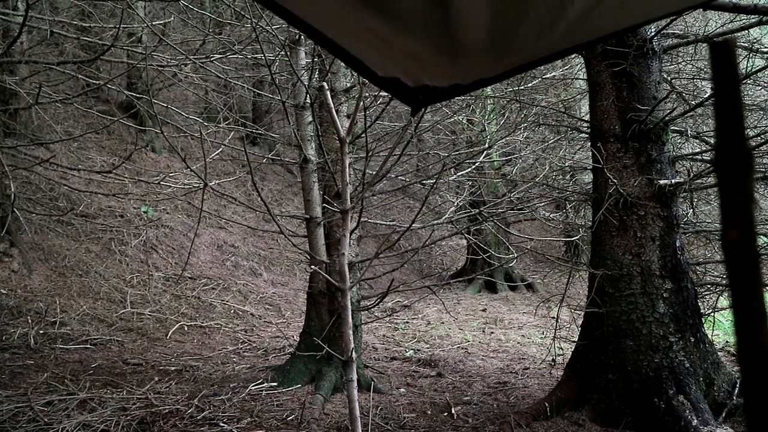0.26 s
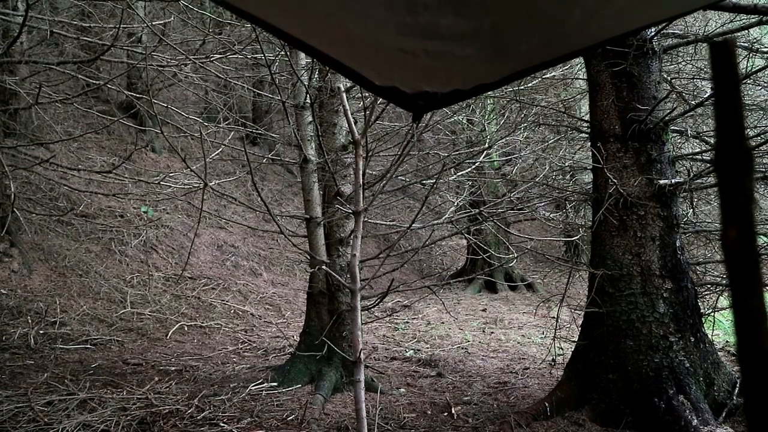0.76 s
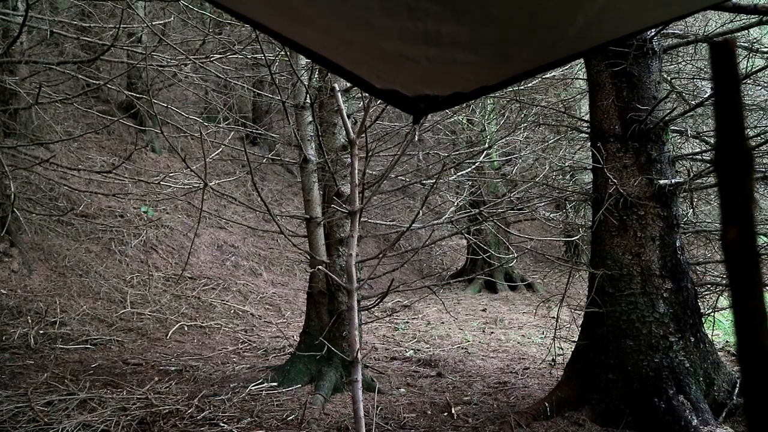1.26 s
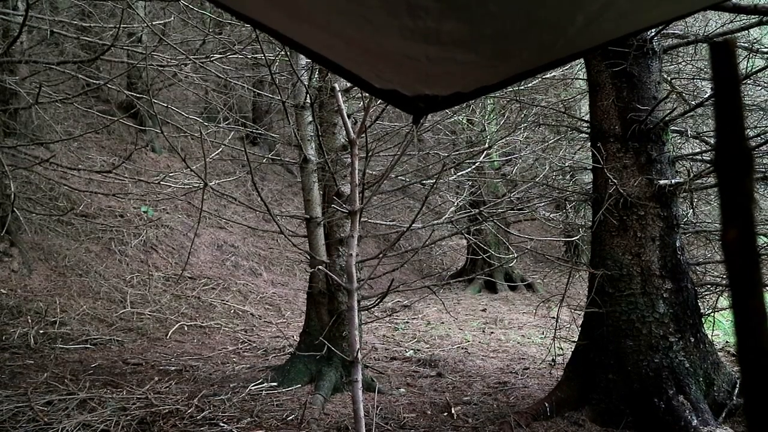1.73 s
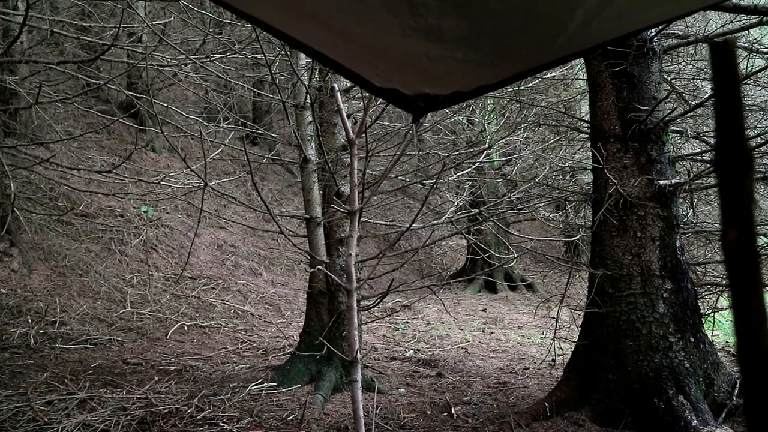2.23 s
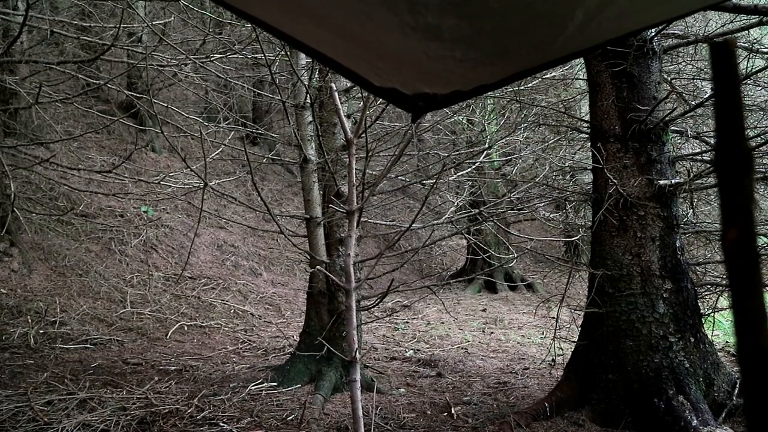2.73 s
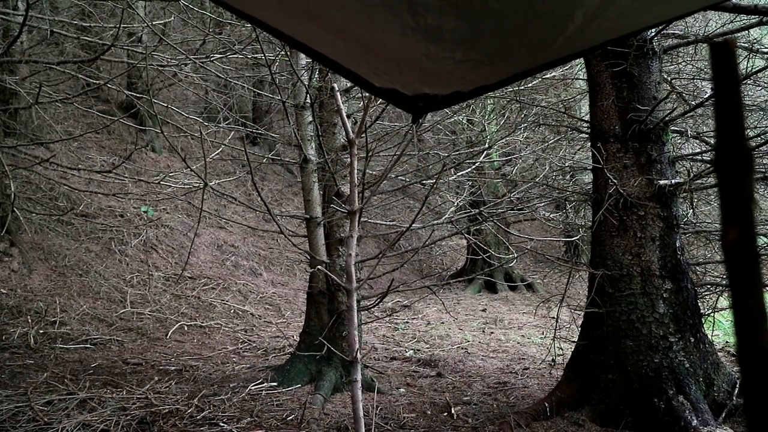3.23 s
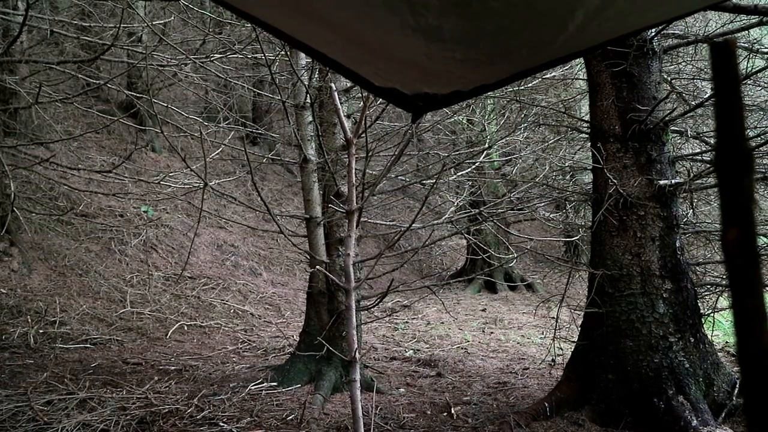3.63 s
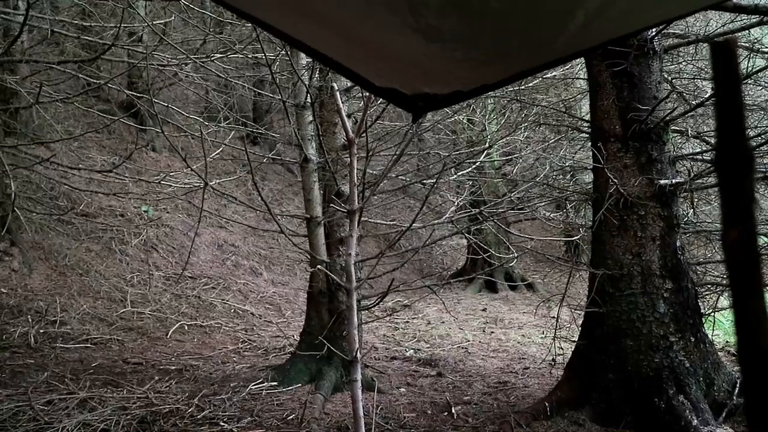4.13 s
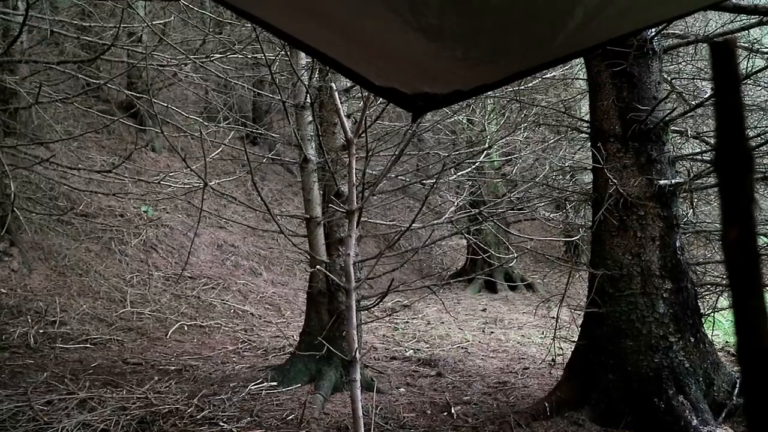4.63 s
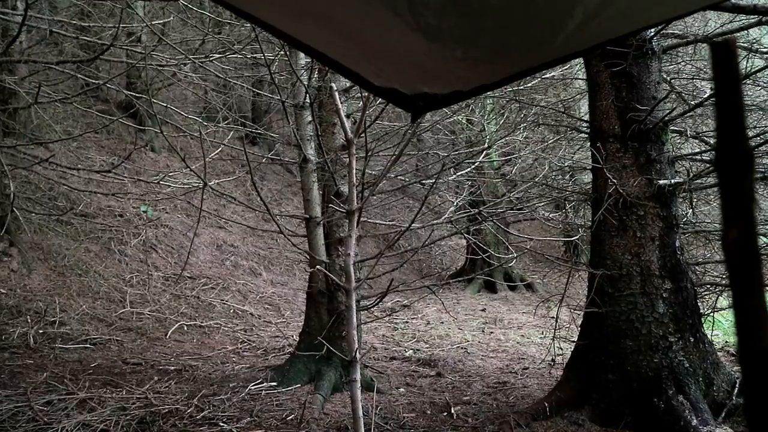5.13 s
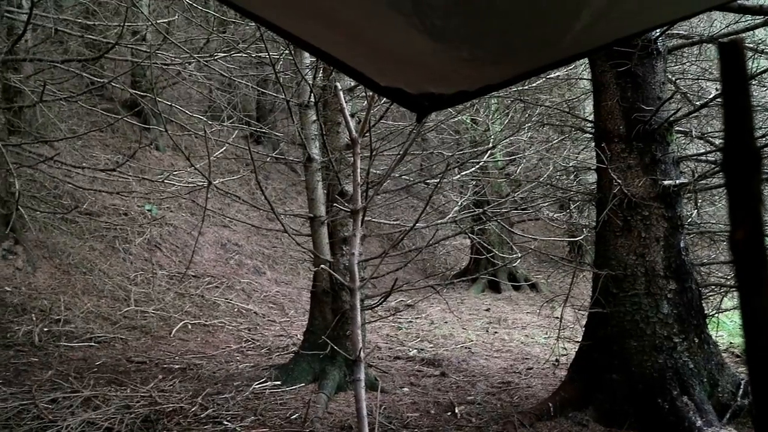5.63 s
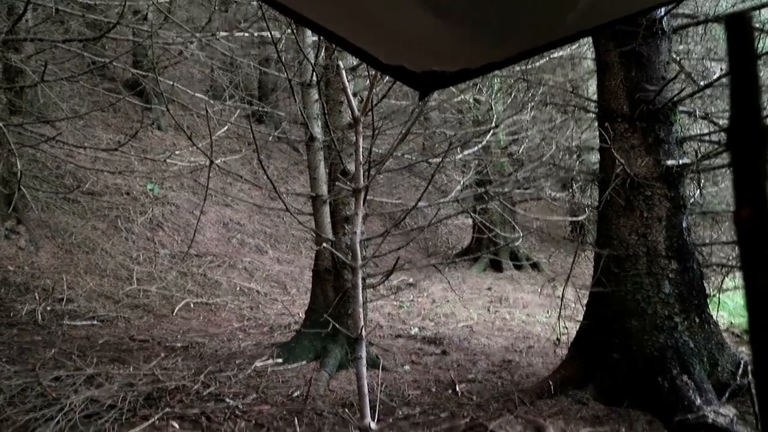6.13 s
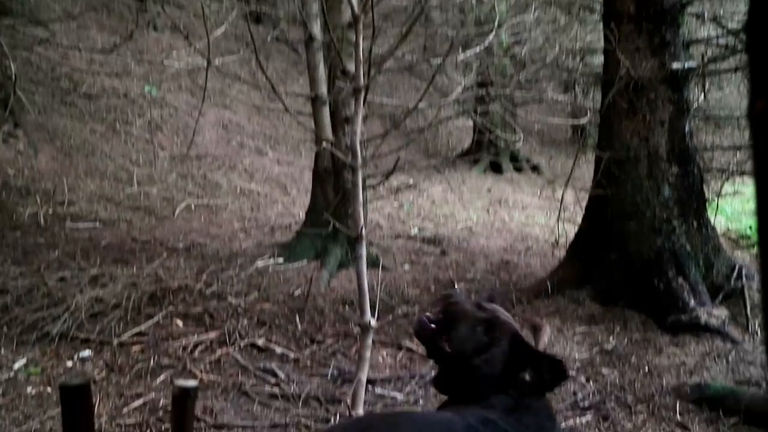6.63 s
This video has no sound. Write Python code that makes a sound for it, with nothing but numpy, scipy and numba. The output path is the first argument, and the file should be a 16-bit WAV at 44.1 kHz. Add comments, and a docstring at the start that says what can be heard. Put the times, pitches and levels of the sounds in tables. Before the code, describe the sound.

Steady wind in conifers; close by, a dog crunches litter, cracks brittle sticks and jingles a metal tag, then fingers bump the microphone.

```python
"""Wind rushes through conifers above a forest camp throughout, while a dog moves about close to the microphone.
It treads on needle litter and breaks dry twigs, modelled as filtered runs of tiny fractures, and from 0.4 s
its metal collar tag jingles as a sum of decaying modes. The breaking is densest from 3.8 to 5.2 s. A hand rests
on the recorder from 4.4 s and taps its case at 5.4 s, with rubs before and after: a short tone and low noise.
Gain control ducks under strong treble and recovers slowly."""
import sys
import numpy as np
from scipy import signal
from scipy.fft import rfft, irfft, next_fast_len
from scipy.io import wavfile
from scipy.ndimage import uniform_filter1d
from numba import njit

SR = 44100
rng = np.random.default_rng(int(sys.argv[2]) if len(sys.argv) > 2 else 0)


def to_wav(s):
    """Save 16-bit WAV."""
    ch = np.atleast_2d(s).T  # columns
    pcm = np.round(np.clip(ch, -1, 1) * 32767)  # PCM
    wavfile.write(sys.argv[1], SR, pcm.astype(np.int16))


N = 303452
TIME = np.arange(N) / SR
HIT = TIME[:SR // 4]  # time axis of one short blow, s


def undb(db):
    """Amplitude gain is the exponential of a level in decibels."""
    return 10 ** (np.asarray(db) / 20)


def unit(x):
    """Normalization: divide by the root mean square."""
    return x / np.sqrt(np.mean(x ** 2))


def curve(rows):
    """Linear interpolation of (time_s, value) rows."""
    return np.interp(TIME, *np.transpose(rows))


def fade(t, t60):
    """Exponential decay by 60 dB in t60 seconds, starting at t = 0."""
    return np.exp(-np.log(1000) * np.maximum(t, 0) / t60)


def add(out, start_s, x):
    """Superposition: mix x into out from start_s."""
    i = int(start_s * SR)
    out[i:i + len(x)] += x[:N - i]


def spectrum_db(hz, points):
    """Linear interpolation of (freq_hz, level_db) points on a log-frequency axis."""
    point_hz, point_db = np.transpose(points)
    return np.interp(np.log(hz + 1), np.log(point_hz), point_db)


def colour(x, points):
    """Minimum-phase filtering: folding the cepstrum makes the given spectrum causal."""
    n = next_fast_len(2 * len(x), True) // 2 * 2
    hz = np.arange(n // 2 + 1) * SR / n
    cepstrum = irfft(np.log(undb(spectrum_db(hz, points))))
    cepstrum[1:n // 2] *= 2
    cepstrum[n // 2 + 1:] = 0
    return irfft(rfft(x, n) * np.exp(rfft(cepstrum)))[:len(x)]


def balance(x, edges_hz, levels_db, span_s):
    """Band decomposition: each part of a blow gets its level over the first span_s."""
    out = 0
    for low_hz, high_hz, db in zip(edges_hz, edges_hz[1:], levels_db):
        band = signal.butter(3, [low_hz, min(high_hz, SR * .45)], "band", fs=SR, output="sos")
        part = signal.sosfilt(band, x)
        out = out + undb(db) * part / np.std(part[:int(span_s * SR)])
    return out


def walk(rate_hz):
    """Low-pass random modulation: levels held for 1 / rate_hz and smoothed twice; rms near 1."""
    k = max(int(SR / rate_hz), 2)
    held = np.repeat(rng.standard_normal(N // k + 1), k)
    return unit(uniform_filter1d(uniform_filter1d(held, k), k)[:N])


def crackle(n, rate_hz, spread_db):
    """Shot noise of tiny fractures at random instants, with exponentially spread sizes in dB."""
    sizes = undb(spread_db * np.minimum(rng.exponential(size=n), 5))
    return unit(sizes * rng.standard_normal(n) * (rng.random(n) < rate_hz / SR))


def swells(rows):
    """Power addition of Gaussian strokes from (centre_s, level_db, half_s) rows."""
    return sum(undb(db) ** 2 * np.exp(-((TIME - s) / half) ** 2) for s, db, half in rows)


SPLINTER_DB = -7  # treble of a break, relative to its level
# twigs that ring above THIN_HZ are thin and splinter brighter
THIN_HZ, THIN_DB_PER_OCTAVE = 4100, 20.5
# twigs breaking: start_s, level_db, tear_s (fibres keep tearing), ring_hz, body_db (low band over the level)
TWIG_BREAKS = [(0.5838, -18, 0.0041, 3600, -23), (0.7362, -31.5, 0.0015, 4030, -27),
               (1.019, -35.5, 0.0033, 3650, -18), (1.6, -28.5, 0.0015, 2050, -3),
               (1.77, -38, .001, 5700, -5), (2.106, -36, .001, 4930, -5), (2.16, -34, .001, 3000, -20),
               (3.023, -21, 0.0037, 3520, -23), (3.224, -22, 0.00086, 3650, -1),
               (3.255, -30.5, 0.0012, 5300, -2), (3.429, -26.5, 0.0036, 3460, -15),
               (3.451, -34, 0.0052, 4330, -15), (3.816, -21, 0.0087, 2580, -19),
               (3.839, -25, .0025, 2580, -20), (3.859, -12, 0.00059, 2420, -21),
               (3.867, -16.5, 0.0012, 3570, -30), (3.929, -29, .001, 5010, -12),
               (4.002, -23, 0.0079, 3320, -4.5), (4.015, -15.5, 0.0026, 3230, -21),
               (4.063, -23, 0.0084, 3170, -27.5), (4.07, -7.5, 0.0035, 3230, -25),
               (4.176, -12.5, 0.0018, 3100, 1), (4.28, -24, .008, 2540, -25),
               (4.295, -21.5, 0.022, 3410, -13), (4.375, -33, .003, 3200, -20),
               (4.449, -31.5, 0.0076, 2880, -3), (4.549, -16, 0.0059, 3180, -23),
               (4.559, -12, .008, 3400, -14), (4.626, -29.5, .003, 2640, -24),
               (4.672, -30.5, .002, 3400, -5), (4.706, -26.5, 0.0061, 2860, 0),
               (4.801, -10.5, .003, 2590, -20), (4.806, -3, 0.0044, 2680, -21.5),
               (4.82, -13.5, 0.0063, 2570, -10.5), (5.112, -17.5, 0.00083, 2590, -8),
               (5.143, -6, 0.0013, 2830, -13.5), (5.16, -20, 0.0089, 3400, -20),
               (5.957, -35, .001, 2830, -12), (6.008, -24.5, 0.00093, 2980, -40)]


def twigs(tail_db=-23, t60=.023, tail_t60=.13):
    """Brittle fracture: a run of cracks rings the stick; the litter around it rattles on briefly."""
    out = np.zeros(N)
    for start_s, level_db, tear_s, ring_hz, body_db in TWIG_BREAKS:
        force = fade(HIT - tear_s, t60) + undb(tail_db) * fade(HIT - tear_s, tail_t60)
        crack = colour(force * crackle(len(HIT), rate_hz=9000, spread_db=0.0), stick(ring_hz))
        splinter_db = SPLINTER_DB + THIN_DB_PER_OCTAVE * max(np.log2(ring_hz / THIN_HZ), 0)
        levels_db = level_db + np.array([body_db, 0, splinter_db])
        add(out, start_s, balance(crack, [150, 1900, 5700, 17000], levels_db, tear_s + .004))
    return out


# mean spectrum of a breaking stick: freq_hz, level_db
TWIG_SPECTRUM = [(150, -52.5), (700, -15.5), (1800, -13.5), (2450, -4.5), (3200, 0.5), (4200, -4),
                 (5500, -10), (7500, -6), (10500, -16), (15000, -18)]


def stick(ring_hz, ring_db=7, width_hz=240, ripple_db=3.5):
    """Resonance: one main peak, and many lesser ones that differ from stick to stick."""
    hz = np.arange(150, 17000, 150)
    ripple = unit(uniform_filter1d(rng.standard_normal(len(hz)), size=3))
    main = ring_db / (1 + ((hz - ring_hz) / width_hz) ** 2)
    return np.transpose([hz, spectrum_db(hz, TWIG_SPECTRUM) + main + ripple_db * ripple])


CRUNCH_DB = -13.5  # treble of every footfall, relative to its level
# crushed litter and buried sticks: freq_hz, level_db
LITTER_SPECTRUM = [(60, -14.5), (300, -6.5), (500, 1.5), (700, 1), (1000, 2.5), (1500, -4), (2300, -6),
                   (3500, -5.5), (8000, -19), (15000, -21)]
# paws and sticks landing on the litter: start_s, level_db, thud_db (low band over the level)
FOOTFALLS = [(0.078, -29.5, -4), (0.12, -44.5, 11.5), (0.207, -34.5, -0.5), (0.458, -32.5, -5),
             (0.625, -49, 11), (1.265, -41.5, 1), (1.41, -52, 2), (2.251, -42.5, -3), (2.341, -36, -19),
             (2.354, -35, -19), (2.776, -36.5, -5), (2.934, -39.5, 0), (2.997, -42, -4), (3.345, -43, 2.5),
             (3.409, -33.5, -13), (3.463, -42, 2.5), (3.504, -40, 2), (3.942, -38.5, 3), (4.038, -20, -5),
             (4.05, -34, -5), (4.141, -39, -3), (4.269, -34.5, -3.5), (4.402, -27.5, -5.5),
             (4.529, -29.5, -5.5), (4.657, -25.5, -5), (4.777, -24.5, -7)]


def steps(t60=0.047):
    """Granular crushing: needles and buried sticks crunch dully under each footfall."""
    out = np.zeros(N)
    for start_s, level_db, thud_db in FOOTFALLS:
        grains = fade(HIT - .0025, t60) * crackle(len(HIT), rate_hz=6900, spread_db=3)
        crunch = colour(grains, LITTER_SPECTRUM)
        levels_db = level_db + np.array([thud_db, 0, CRUNCH_DB])
        add(out, start_s, balance(crunch, [110, 700, 2500, 14000], levels_db, 0.02))
    return out


# the tag swings back and touches once more, lightly: mean delay, level before strike_db
SWING_S, SWING_DB = 0.12, -58.5
# main modes of the tag: pitch_hz
MAIN_MODES_HZ = [6990, 7920, 14485]
# collar tag strikes: start_s, level_db (before strike_db), lean_db (second main mode over the first),
# high_db (high main mode over the level)
TAG_STRIKES = [(0.403, -27, 13, -14), (0.413, -24, 13, -2), (0.481, -41, -14, -25), (0.524, -36, -15.5, 0),
               (0.74, -51, 12, -19), (2.045, -40, -5, 9), (2.16, -21, -15, -35), (2.175, -22.5, -16, -26),
               (2.216, -37.5, 26, -10), (2.295, -39, 6, -22), (3.345, -43.5, -11, -5),
               (3.454, -37, -7, -14), (3.802, -32, -13, -34), (3.822, -36, 8, 4), (3.982, -34.5, 15.5, -6),
               (4.015, -23, -0.5, 9), (4.187, -26.5, 2.5, 0), (4.207, -4, 8, 5.5), (4.48, -39, 14.5, -15),
               (4.73, -33.5, 2, 7), (5.99, -44.5, -10, -7), (6.609, -53, -7, 12)]


def tag(stir_db, strike_db=5, rattle_s=.05, rattle_db=-58, scatter_db=4, scrape_db=-18, scrape_t60=0.078, count=4):
    """Modal excitation: each strike favours other modes; scraping on the ring and light contacts follow."""
    out = np.zeros(N)
    hz, mode_db, _ = np.transpose(TAG_PARTIALS)
    lively_db = stir_db - np.mean(stir_db)
    for start_s, level_db, lean_db, high_db in TAG_STRIKES:
        levels_db = level_db + np.array([min(-lean_db, 0), min(lean_db, 0), high_db])
        strike = ring(mode_db + np.interp(hz, MAIN_MODES_HZ, levels_db), detune=.0006)
        noise = rng.standard_normal(len(HIT))
        scrape = unit(colour(noise, [(400, -40), (3000, 2.0), (8000, 12.5), (15000, 5.5)]))
        scrape_gain = undb(max(levels_db) + scrape_db)
        add(out, start_s, strike + scrape_gain * fade(HIT, scrape_t60) * scrape)
        swing_db = SWING_DB + mode_db + scatter_db * rng.standard_normal(len(hz))
        swing = ring(swing_db, detune=.0006)
        add(out, start_s + SWING_S * (.5 + rng.random()), swing)
        # the livelier the dog, the harder the rattle; halved mode levels bring out the weak modes
        for lag_s in rattle_s * rng.random(count):
            touch_db = rattle_db + lively_db[int(start_s * SR)] + mode_db / 2
            touch_db = touch_db + scatter_db * rng.standard_normal(len(hz))
            add(out, start_s + lag_s, ring(touch_db, detune=.012))
    return out * undb(strike_db)


# vibration modes of the tag: pitch_hz, level_db, t60_s
TAG_PARTIALS = [(5730, -27, .14), (6990, 0, .1), (7080, -16, .1), (7845, -14, .09), (7921, 0, .11),
                (9080, -20, .06), (9400, -29, .15), (10680, -26, .12), (12820, -27, .1), (14485, 0, .06),
                (14850, -17, .12), (15080, -24, .08)]


def ring(levels_db, detune, contact_s=0.0015):
    """Modal synthesis: one contact rings every mode; the touching metal pulls each a little off pitch."""
    out = 0
    for (mode_hz, _, t60), db in zip(TAG_PARTIALS, levels_db):
        pitch_hz = mode_hz * (1 + detune * rng.standard_normal())
        phase = pitch_hz * HIT + rng.random()  # cycles
        out = out + undb(db) * fade(HIT, t60) * np.sin(2 * np.pi * phase)
    return out * np.minimum(HIT / contact_s, 1)


# dry needles rubbing and ticking: freq_hz, level_db
NEEDLE_SPECTRUM = [(300, -7), (1200, -4), (3200, 0), (5000, -5.5), (7200, -1.5), (10000, -8), (15000, -18)]


def rustle(stir_db, patchy_db=4.0, rub_db=-2.5, tick_db=-3, chip_db=-9):
    """Frictional noise: dry needles rub and tick unevenly; now and then a brittle one breaks."""
    rub = colour(crackle(N, rate_hz=8200, spread_db=-0.5), NEEDLE_SPECTRUM)
    rub = unit(rub * undb(patchy_db * walk(45)))
    brittle = crackle(N, rate_hz=80, spread_db=5.5)
    chips = unit(colour(brittle, [(2000, -21.5), (5000, -5), (8500, 1), (15000, -7.5)]))
    return (undb(rub_db) * rub + undb(tick_db) * ticks() + undb(chip_db) * chips) * undb(stir_db)


def ticks(count=1500, cycles=14, spread_db=6.0):
    """Damped oscillation: each tiny bit of litter rings a few cycles at its own pitch."""
    out, t = np.zeros(N), HIT[:SR // 40]
    for when, place, length, size in rng.random((count, 4)):
        pitch_hz = 500 * 30 ** place
        level_db = spread_db * min(-np.log(1 - size), 4) + spectrum_db(pitch_hz, NEEDLE_SPECTRUM)
        decay = fade(t, cycles * (.5 + length) / pitch_hz)
        tone = decay * np.sin(2 * np.pi * pitch_hz * t)
        add(out, when * TIME[-1], undb(level_db) * np.sqrt(pitch_hz) * tone)
    return unit(out)


# footfalls and breaks stir the needles: level for a 0 dB blow, dB per dB of the blow, time constants of power
STIR_DB, STIR_SLOPE, STIR_RISE_S, STIR_SETTLE_S = -34, 0.44, 0.048, 0.04
REST_DB = -60  # needles while the dog stands still
# the dog drags a paw through the needles: centre_s, level_db, half_s
PAW_DRAGS = [(0.02, -45.5, .06), (0.45, -40, .05), (0.9, -49, 0.12), (1.8, -44.5, 0.041),
             (2.3, -48.5, 0.48), (3.45, -43, 0.1), (3.85, -39, .05), (4.3, -37.5, 0.057),
             (5.82, -47.5, .08), (6.65, -47.5, 0.044)]


def stir():
    """Energy envelope in dB: needles stir around each blow, more for a harder one, and under each paw drag."""
    power = undb(REST_DB) ** 2 + swells(PAW_DRAGS)
    for start_s, level_db, *_ in FOOTFALLS + TWIG_BREAKS:
        away = np.maximum((start_s - TIME) / STIR_RISE_S, (TIME - start_s) / STIR_SETTLE_S)
        blow_power = undb(STIR_DB + STIR_SLOPE * level_db) ** 2
        power = np.maximum(power, blow_power * np.exp(-away))
    return 10 * np.log10(power)


def knocks(rate_hz=14, knock_db=-6, t60=.035, spread_db=2.5):
    """Random impacts: small sticks shift under the dog's weight and knock together."""
    blows = signal.fftconvolve(abs(crackle(N, rate_hz, spread_db)), fade(HIT, t60))[:N]
    return undb(knock_db) * unit(colour(blows * rng.standard_normal(N), LITTER_SPECTRUM))


HOLD_S, HOLD_DB = 4.4, -53.5  # the resting hand: from when, how loud
# noise of the handled case: freq_hz, level_db
CASE_SPECTRUM = [(20, -2), (40, -15), (55, -6), (95, 0.5), (115, -3.5), (150, 4), (195, -5), (235, -9),
                 (272, -4), (330, -17), (520, -28), (860, -14.5), (1300, -31), (4000, -61)]
# fingers slide on the case: centre_s, level_db, half_s
FINGER_RUBS = [(5.26, -41, 0.031), (5.39, -34, 0.033), (5.6, -37.5, 0.11), (5.89, -37, 0.067),
               (6.35, -43, .14), (6.33, -31, .045), (6.62, -51, .03)]
# a fingertip on the case: start_s, level_db, pitch_hz, t60_s
FINGER_TAP = (5.4455, -5, 520, .036)


def hand(rub_db=3.5, tick_db=-28):
    """Structure-borne sound: resting and rubbing fingers rumble on the case, and one tap rings it."""
    grip = np.sqrt(swells(FINGER_RUBS) + undb(HOLD_DB) ** 2 * (TIME > HOLD_S))
    rumble = unit(colour(rng.standard_normal(N), CASE_SPECTRUM))
    out = rumble * grip * undb(rub_db * walk(30))  # rub_db: unevenness of the rubbing
    start_s, level_db, pitch_hz, t60 = FINGER_TAP
    # a soft fingertip takes a few milliseconds to push the case
    push = np.minimum(HIT / .003, 1) * fade(HIT - .004, t60)
    tick_noise = unit(colour(rng.standard_normal(len(HIT)), NEEDLE_SPECTRUM))
    tick = undb(tick_db) * fade(HIT, t60) * tick_noise
    add(out, start_s, undb(level_db) * (push * np.sin(2 * np.pi * pitch_hz * HIT) + tick))
    return out


def trunks(x, t60=0.22, wet_db=-23):
    """Scattering: thin echoes from the tree trunks arrive differently at each port."""
    t = TIME[:SR // 2]
    ports = []
    for _ in range(2):
        arrivals = crackle(len(t), rate_hz=830, spread_db=1) * fade(t, t60)
        echo = colour(arrivals, [(300, -8), (3000, -6.5), (14000, 14.0)])
        ports.append(signal.fftconvolve(x, echo / np.linalg.norm(echo))[:N])
    return undb(wet_db) * np.array(ports)


WIND_DB = -42.81  # level of the wind at a gust value of 0 dB
# wind in the crowns: time_s, level_db
GUST_CURVE = [(0, 4), (.5, 3), (1, 1.7), (1.5, 2.1), (2.6, 0.1), (3.2, 2), (3.8, 1), (4.5, -1.5), (5.2, 3),
              (5.8, -1), (6.88, 0.5)]
# wind noise: freq_hz, level_db (per Hz)
WIND_SPECTRUM = [(25, -38), (60, -10.5), (100, -8.5), (150, -3), (200, -1.5), (330, -1), (750, 3.5),
                 (1300, 0.5), (2300, -5.5), (3700, -11.5), (6000, -16), (9000, -16.5), (10200, -23.5),
                 (16000, -21)]


def wind(flicker_db=1.5, sway_db=1.28):
    """Aeolian noise: countless needles shed eddies; boughs sway and flutter, each octave band on its own."""
    hz = np.arange(N // 2 + 1) * SR / N
    air = rfft(rng.standard_normal(N)) * undb(spectrum_db(hz, WIND_SPECTRUM))
    octave, out = np.log2(np.clip(hz, 32, 16384)), 0
    for centre in range(5, 15):  # overlapping triangular bands at 2 ** centre Hz
        band = irfft(air * np.maximum(1 - abs(octave - centre), 0), N)
        out = out + band * undb(sway_db * walk(2.316) + flicker_db * walk(17))
    return unit(out) * undb(WIND_DB + curve(GUST_CURVE))


# difference between the ports, for wind and dog: freq_hz, level_db (side over mid)
WIND_SIDE_SPECTRUM = [(60, -15), (380, -11), (700, -17), (1300, -22.5), (2400, -40.5), (4400, -13.5),
                      (8100, -7.5), (15000, 1)]
DOG_SIDE_SPECTRUM = [(100, -13), (380, -22), (700, -25), (2400, -26.5), (8000, -23), (15000, -22.5)]


def scene():
    """Mid-side stereo: wind comes from all around; the dog has a slight phase difference between two ports."""
    stir_db = stir()
    dog = twigs() + steps() + tag(stir_db) + rustle(stir_db) + knocks() * undb(stir_db)
    quarter_turn = irfft(1j * rfft(dog), N)  # every frequency shifted by 90 degrees
    side = colour(wind(), WIND_SIDE_SPECTRUM) + colour(quarter_turn, DOG_SIDE_SPECTRUM)
    return dog + trunks(dog) + hand() + wind() + side * np.array([[1], [-1]])


@njit
def duck(over_db, hold_s, release_db):
    """Peak-hold gain reduction in dB: instant attack, a hold, then release by release_db a second."""
    out, cut, wait = np.zeros(len(over_db)), 0., 0.
    for i in range(len(over_db)):
        wait -= 1 / SR
        if over_db[i] > cut:
            cut, wait = over_db[i], hold_s
        elif wait < 0:
            cut = max(cut - release_db / SR, 0.)
        out[i] = cut
    return out


TOP_HZ = 15900  # upper edge of the recorder's pass band


def record(dry, ceiling_db=-7, hold_s=1.0, release_db=13.5):
    """Compression most alert to treble, then a steep low-pass and clipping at full scale."""
    edge = np.diff(dry.mean(axis=0), prepend=0)  # differencing stresses treble
    power = uniform_filter1d(edge ** 2, size=128)
    over_db = 10 * np.log10(np.maximum(power, 1e-12)) - ceiling_db
    cut_db = duck(over_db, float(hold_s), float(release_db))
    out = dry * undb(-cut_db + np.array([[-.2], [.2]]))  # the ports differ slightly in gain
    low_pass = signal.ellip(8, .2, 70, TOP_HZ, fs=SR, output="sos")
    return np.clip(signal.sosfilt(low_pass, out), -1, 1)


dry = scene()
out = record(dry)
to_wav(out)
```